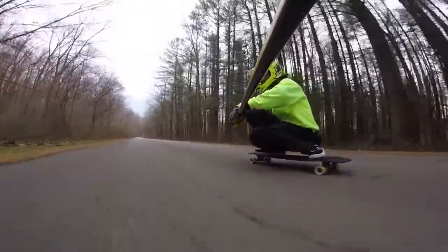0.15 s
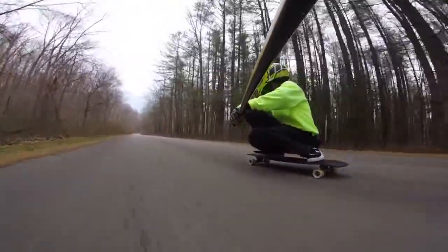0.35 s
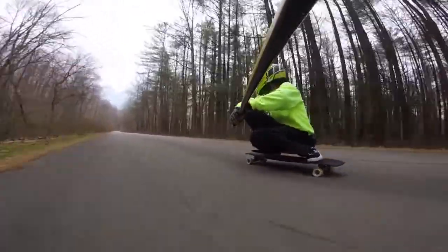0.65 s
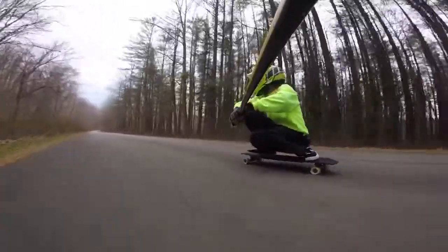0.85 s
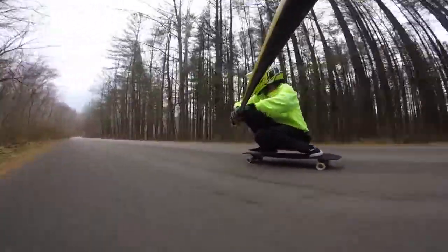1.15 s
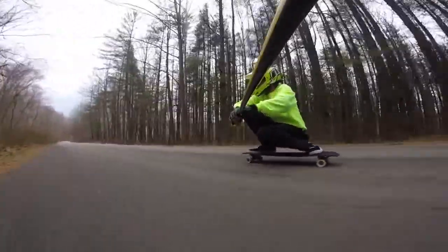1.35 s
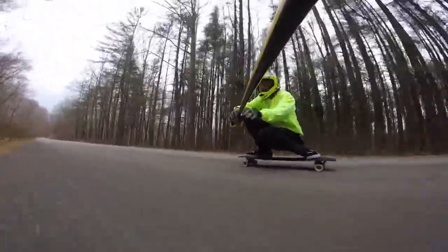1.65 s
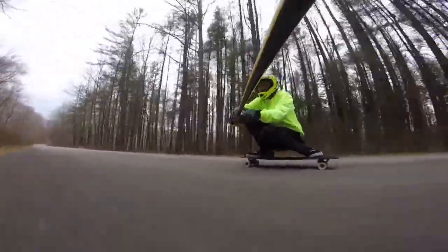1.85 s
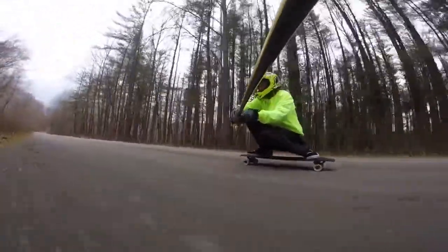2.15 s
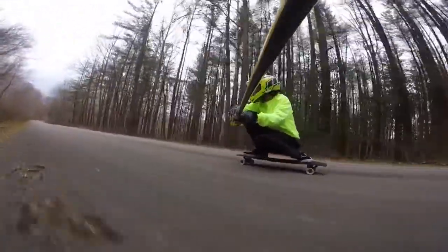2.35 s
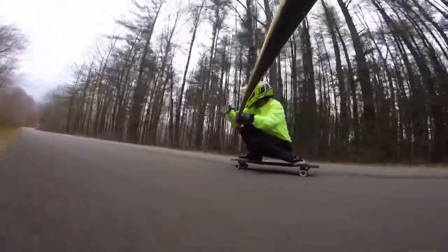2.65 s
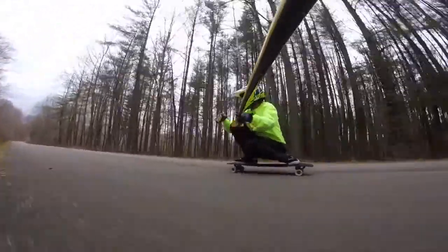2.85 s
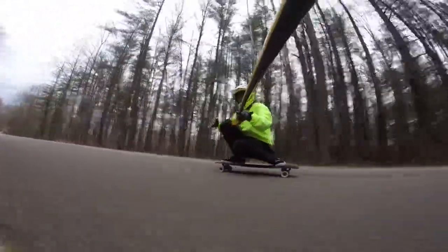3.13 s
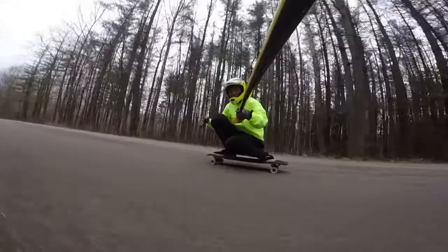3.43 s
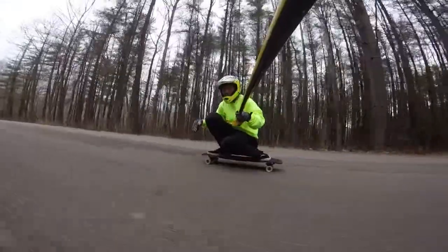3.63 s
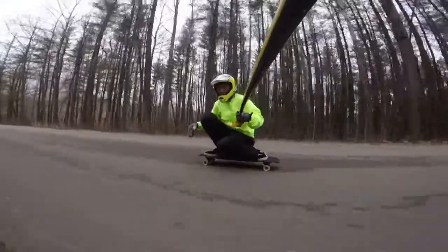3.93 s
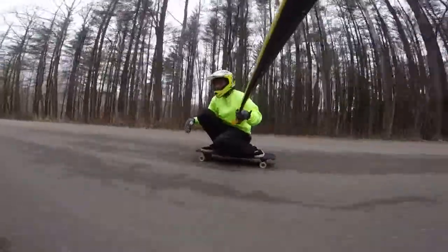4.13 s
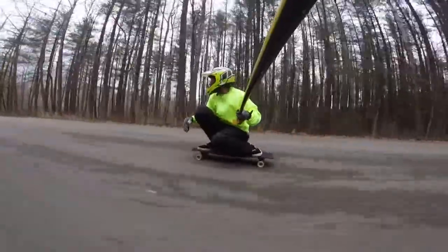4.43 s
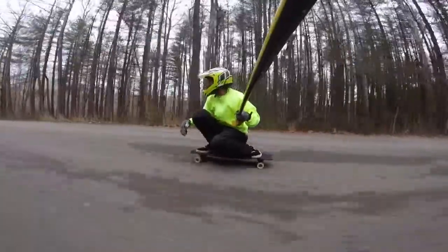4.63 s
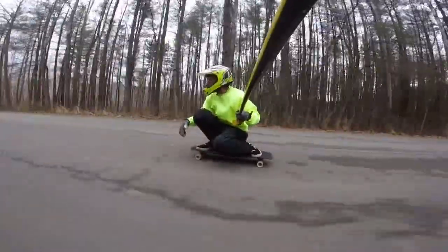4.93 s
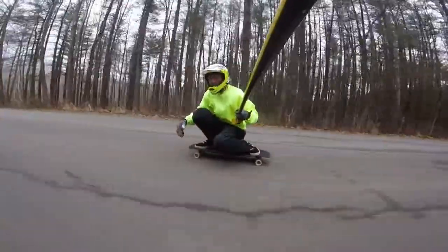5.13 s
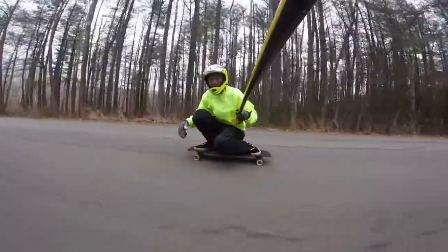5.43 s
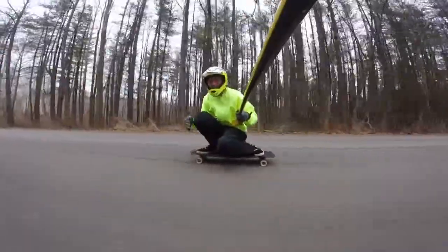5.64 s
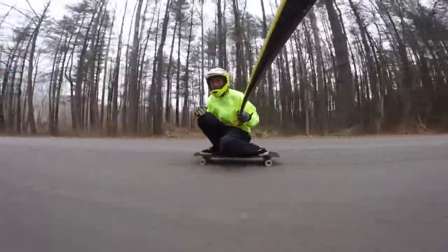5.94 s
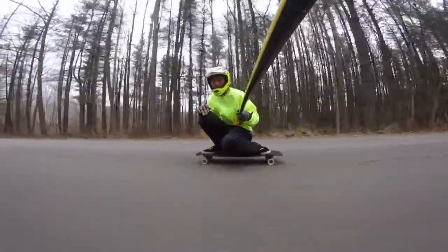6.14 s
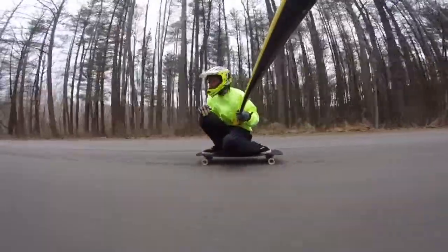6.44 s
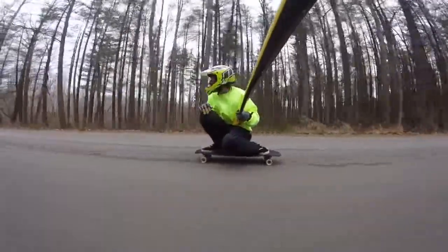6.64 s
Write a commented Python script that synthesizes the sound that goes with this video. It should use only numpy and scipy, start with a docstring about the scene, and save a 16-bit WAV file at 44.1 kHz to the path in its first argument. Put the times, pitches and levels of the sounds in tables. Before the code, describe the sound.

Wind buffets a cased microphone over the steady roar of longboard wheels on asphalt, with two loud hard knocks and later crackling gusts.

```python
"""On a downhill asphalt road, a longboarder carries a microphone in a hard case on a pole.
Wind is filtered noise: slow buffets, turbulence that flares with suction, eddies shed by the pole.
Wheels are noise bands that drone, roar, whirr and hiss; grit clicks and short chirps squeak.
Twice the mount knocks loudly, as cracks, sagging thuds and decaying modes, with a weak rebound at the end.
Gain control ducks at each loud knock and takes about a second to recover."""
import sys
import numpy as np
from scipy import signal
from scipy.fft import rfft, irfft, next_fast_len
from scipy.io import wavfile
from scipy.ndimage import uniform_filter1d, minimum_filter1d

SR = 44100
rng = np.random.default_rng(int(sys.argv[2]) if len(sys.argv) > 2 else 0)


def pcm_store(signal):
    """Save signal as 16-bit PCM."""
    levels = np.round(np.clip(np.atleast_2d(signal), -1, 1) * 32767)
    wavfile.write(sys.argv[1], SR, levels.astype(np.int16).T)


N = 298998
TIME = np.arange(N) / SR


def from_db(db):
    """Logarithmic level: decibels to an amplitude gain."""
    return 10 ** (np.asarray(db) / 20)


def rms_one(x):
    """Normalisation: scale to rms 1."""
    return x / np.sqrt(np.mean(x ** 2) + 1e-20)


def curve(rows):
    """Linear interpolation: a (t/s, value) table at every sample."""
    return np.interp(TIME, *np.transpose(rows))


def ramp(start_s, length_s):
    """Linear transition: from 0 to 1 in the given time."""
    return np.clip((TIME - start_s) / length_s, 0, 1)


def bump(s, half_s):
    """Raised-cosine window: a smooth rise to 1 at s and back."""
    return np.cos(np.pi / 2 * np.minimum(np.abs(TIME - s) / half_s, 1)) ** 2


def decay(t, t60):
    """Exponential damping: falls by 60 dB in t60."""
    return np.exp(-np.log(1000) * t / t60)


def swell(t, peak_s, steepness):
    """Transient force: builds to 1 at peak_s and dies away."""
    return (t / peak_s * np.exp(1 - t / peak_s)) ** steepness


def coloured(x, gain_at):
    """Linear filtering by a function of frequency; white noise or a click keeps its energy."""
    size = next_fast_len(N + SR // 10)
    hz = np.maximum(np.arange(size // 2 + 1) * SR / size, 1)
    return irfft(rfft(x, size) * rms_one(gain_at(hz)), size)[:N]


def contour(spectrum, rolloff_db_per_octave=18):
    """Spectral envelope: gain for a (f/Hz, level/dB) table that keeps falling above its last point."""
    points, db = np.transpose(spectrum)

    def gain_at(hz):
        octaves_above = np.maximum(np.log2(hz / points[-1]), 0)
        level = np.interp(np.log(hz), np.log(points), db)
        return from_db(level - rolloff_db_per_octave * octaves_above)
    return gain_at


def shaped(gain_at):
    """Filtered white noise: rms 1, with the given function of frequency as its spectrum."""
    return rms_one(coloured(rng.standard_normal(N + SR // 10), gain_at))


def noise(spectrum):
    """Filtered white noise: rms 1, with a (f/Hz, level/dB) spectrum."""
    return shaped(contour(spectrum))


def resonant_noise(centre_hz, width_hz):
    """Resonance: noise passed twice through one resonator."""
    return shaped(lambda hz: 1 / (1 + ((hz ** 2 - centre_hz ** 2) / (hz * width_hz)) ** 2))


def flutter(rate, depth_db):
    """Random modulation: a gain of rms depth_db that wanders about rate times a second."""
    return from_db(depth_db * shaped(lambda hz: 1 / (1 + (hz / rate) ** 2)))


def grains(per_s, spectrum):
    """Shot noise: dense random clicks of uneven size; rms 1."""
    clicks = (rng.random(N) < per_s / SR) * rng.uniform(-1.1, 1, N)
    return rms_one(coloured(clicks, contour(spectrum)))


def ticks(rows, spectrum):
    """Damped impacts: a tiny noise burst at each (t/s, level/dB, t60/s), its onset slightly rounded."""
    envelope, t = np.zeros(N + SR), TIME[:SR // 10]
    for s, db, t60 in rows:
        start = round(s * SR)
        envelope[start:start + len(t)] += from_db(db) * decay(t, t60)
    return uniform_filter1d(envelope[:N], size=24) * noise(spectrum)


# the carve turns the case across the wind
CROSSWIND_S, CROSSWIND_TAKES_S = 3.65, 0.58
# strength of the air stream on the case, as turbulence: t/s, level/dB
AIR_STREAM = [(0, -21.5), (1.05, -23.5), (1.6, -21), (1.8, -27), (2.0, -25), (2.35, -28.5), (2.8, -27),
              (3.05, -21.5), (3.3, -26), (3.7, -22), (4.35, -24.5), (4.75, -22.5), (5.2, -26),
              (5.75, -20.5), (6.25, -21), (6.65, -21)]


def air_levels(mean_db=-24, buffet_db=-17.5, buffet_follows=0.17, buffet_cross_db=-3.0,
               crackle_db=-66, crackle_follows=0.34, crackle_cross_db=9):
    """Flow incidence: all gains follow the air stream; crosswind trades buffet for crackle."""
    stream = curve(AIR_STREAM) - mean_db
    across = ramp(CROSSWIND_S, CROSSWIND_TAKES_S)
    buffet = buffet_db + buffet_follows * stream + buffet_cross_db * across
    turbulence = mean_db + stream
    crackle = crackle_db + crackle_follows * stream + crackle_cross_db * across
    return from_db([buffet, turbulence, crackle])


# single gusts: t/s, half length/s, level/dB
GUSTS = [(0.784, 0.26, -19), (1.704, 0.18, -19.5), (2.097, .3, -13), (3.662, 0.45, -16.5),
         (5.015, 0.13, -13)]


def gusts():
    """Low-frequency pressure pulses: big, slow lumps of air thump the case."""
    level = sum(from_db(db) * bump(s, half_s) for s, half_s, db in GUSTS)
    return level * resonant_noise(centre_hz=36, width_hz=54)


# the eddies lock in step and throb: start t/s, length/s, level/dB
THROBS = [(4.017, 0.18, -21), (5.066, 0.44, -16.5)]
THROB_HZ, THROB_FADE_S = 83, 0.022


def throb():
    """Coherent vortex shedding: eddies in step beat the air at an almost steady pitch."""
    hz = THROB_HZ * flutter(rate=8, depth_db=.5)
    level = np.zeros(N)
    for s, length, db in THROBS:
        to_nearest_end = np.minimum(TIME - s, s + length - TIME)
        level += from_db(db) * np.clip(to_nearest_end / THROB_FADE_S, 0, 1)
    return level * flutter(rate=15, depth_db=1.0) * np.sin(2 * np.pi * np.cumsum(hz) / SR)


# eddies shed by the pole: t/s, level/dB
SHEDDING = [(0, -41), (3.6, -37), (4.05, -18), (4.4, -22.5), (4.7, -14.5), (5.0, -20), (5.2, -23.5),
            (5.55, -19.5), (5.8, -25.5), (6.78, -18)]


def shed_eddies():
    """Vortex shedding: eddies off the pole make noise around one resonance."""
    return from_db(curve(SHEDDING)) * resonant_noise(centre_hz=78.8, width_hz=40.6)


# spectra of slow buffets, turbulence and fine crackle of the air on the port: f/Hz, level/dB per Hz
BUFFET = [(8, -1.5), (18, -7.5), (30, 5), (55, -0.5), (100, -2.5), (135, -8.5), (220, -35.5), (500, -93.5)]
TURBULENCE = [(60, -23.5), (125, 0.5), (220, -3), (310, -8), (420, -13), (650, -22.5), (850, -23.5),
              (1300, -53.5), (2200, -54), (4200, -73.5), (7000, -72), (12000, -94.5)]
CRACKLE = [(700, -12.5), (1400, 5), (2000, 6), (2500, 1.5), (3000, -7.5), (3700, -4.5), (4300, -15.5),
           (6700, -13.5), (8200, -23.5), (10500, -25.5), (12500, -45)]
CRACKLES_PER_S, CRACKLE_GROWTH_DB = 3000, 4.2


def wind(suction_db=2.5):
    """Turbulent pressure: suction makes turbulence flare; the largest lumps crackle on the port."""
    buffet, turbulence, crackle = air_levels()
    lumps = buffet * noise(BUFFET) + shed_eddies() + throb() + gusts()
    # pressure relative to its rms in the surrounding half second or so
    local_rms = np.sqrt(uniform_filter1d(lumps ** 2, size=20000))
    pressure = np.clip(lumps / local_rms, -2.6, 2.6)
    flare = from_db(-suction_db * pressure)
    breaking = rms_one(from_db(CRACKLE_GROWTH_DB * np.abs(pressure)))
    rushing = turbulence * flare * noise(TURBULENCE)
    return lumps + rushing + crackle * breaking * grains(CRACKLES_PER_S, CRACKLE)


# the hardest eddies spit on the port: t/s, level/dB of the main click
SPITS = [(3.8061, -34), (4.017, -34), (4.0373, -30), (4.101, -30), (4.4783, -30), (4.5905, -29),
         (4.6443, -30), (4.8065, -30), (4.8463, -30), (4.9065, -30), (4.9516, -33), (5.0614, -28),
         (5.1561, -35), (5.1813, -32), (5.2111, -25.5), (5.2925, -31), (5.3591, -31), (5.3644, -27.5),
         (5.3838, -32), (5.4072, -33), (5.4873, -30.5), (5.5081, -31), (5.5754, -33), (5.5889, -25.5),
         (5.7324, -31), (5.7728, -28), (5.8367, -27), (5.9322, -32), (6.1038, -32.5), (6.1375, -33),
         (6.1796, -31), (6.1941, -32.5), (6.2459, -26.5), (6.251, -35), (6.3732, -34), (6.4173, -33),
         (6.4411, -32), (6.5256, -33.5), (6.6012, -33.5), (6.6177, -32.5), (6.6838, -33), (6.698, -29),
         (6.732, -28), (6.738, -33)]
# spectrum of a spit: f/Hz, level/dB
SPIT_SPECTRUM = [(700, -5), (1400, 2), (2600, 2), (3700, -1.5), (4300, -6), (6700, -8), (8200, -17),
                 (10500, -21), (12000, -33), (16000, -48)]
# the weaker clicks: greatest distance from the main one, and level relative to it
SPIT_CRUMBLE_S, SPIT_CRUMBLE_DB = .003, -9


def spits(count=3):
    """Impulsive flow noise: each hard eddy breaks with one click among a few weaker ones."""
    clicks = np.zeros(N)
    for s, db in SPITS:
        offsets, sizes = rng.uniform(-1, 1, (2, count))
        places = np.round((s + SPIT_CRUMBLE_S * offsets) * SR).astype(int)
        clicks[places] += from_db(db + SPIT_CRUMBLE_DB) * np.sign(sizes)
        clicks[round(s * SR)] += from_db(db)
    return coloured(clicks, contour(SPIT_SPECTRUM))


# how hard the wheels press and scrub on the asphalt: t/s, level/dB re cruising
ROAD_LOAD = [(0, 4.5), (.35, 4.5), (.95, -2), (1.33, 2), (1.58, 0), (1.69, -8.5), (1.85, -7), (2.05, 0.5),
             (2.75, -4.5), (3.1, 0.5), (4.0, 2.5), (4.25, 1), (4.75, 3), (5.4, -4.5), (6.05, 0),
             (6.78, -3.5)]
# the microphone swings away from the wheels: their treble dims and the drone gains a little
SHADOW_S, SHADOW_TAKES_S = 4.85, 1.3


def wheel_level(db, follows, carve_db, shadow_db):
    """Load and directivity: a share of the road load, a drop in the carve, a shift as the mic turns."""
    carve = carve_db * ramp(CROSSWIND_S, CROSSWIND_TAKES_S)
    shadow = shadow_db * ramp(SHADOW_S, SHADOW_TAKES_S)
    return from_db(db + follows * curve(ROAD_LOAD) + carve + shadow)


# each knock jolts the deck, which drones louder for a while; the fade is to 1/e in dB
JOLT_DB, JOLT_FADE_S = 4.5, 0.62


def jolts():
    """Shock excitation: the drone flares with the strength of each knock and settles again."""
    hardest_db = max(db for _, db, *_ in KNOCKS)
    lift_db = np.zeros(N)
    for s, db, *_ in KNOCKS:
        settling = (TIME > s) * np.exp(-np.abs(TIME - s) / JOLT_FADE_S)
        lift_db += JOLT_DB * from_db(db - hardest_db) * settling
    return from_db(lift_db)


# spectra of the hollow, steep-sided deck resonance, the roar under the wheels, the bearings,
# the tread's hiss, and its sizzle on the straight: f/Hz, level/dB per Hz
DRONE = [(300, -40), (420, -19), (475, -4), (545, 0), (625, -2.5), (665, -17), (760, -32)]
ROAR = [(330, -28.5), (410, -1.5), (470, 6), (600, 0.5), (700, -1), (780, 0.5), (1000, -7), (1200, -16),
        (1500, -26.5), (1800, -43), (3000, -68.5)]
WHIRR = [(1200, -10.5), (1800, -6), (2200, 1), (2550, -1), (2950, -13), (3250, -6), (3650, 0.5),
         (3900, -5.5), (4200, -12), (6000, -31.5)]
HISS = [(2500, -11.5), (4200, -12), (4800, 1), (5500, 1), (6700, 1.5), (7600, -5.5), (8050, -14),
        (8450, -10), (9000, -18.5), (9700, -14.5), (11800, -16.5), (13000, -46)]
SIZZLE = [(7000, -33), (8450, 0), (9000, -13), (9700, -3), (11000, -1), (12000, -3), (13000, -30)]
ROAR_DB, SIZZLE_DB = -32.5, -76  # when cruising
TURN_S, TURN_TAKES_S = 1.54, .2  # the sizzle fades out as the turn begins


def wheels():
    """Rolling noise: road grain shakes the deck and roars; bearings whirr and the tread hisses."""
    deck = jolts() * wheel_level(db=-31.0, follows=0.38, carve_db=-8.5, shadow_db=2.5) * noise(DRONE)
    contact = from_db(ROAR_DB + curve(ROAD_LOAD)) * noise(ROAR)
    bearings = wheel_level(db=-55.5, follows=0.43, carve_db=-1.5, shadow_db=-13.5) * noise(WHIRR)
    tread = wheel_level(db=-61.5, follows=.7, carve_db=-5.0, shadow_db=-8.0) * noise(HISS)
    straight = 1 - ramp(TURN_S, TURN_TAKES_S)
    sizzle = from_db(SIZZLE_DB + .5 * curve(ROAD_LOAD)) * straight * noise(SIZZLE)
    low = flutter(rate=99, depth_db=2.18) * (deck + contact)
    return low + flutter(rate=130, depth_db=1.5) * (bearings + tread + sizzle)


# grit under the wheels: t/s, f/Hz, level/dB
GRIT = [(3.7984, 3500, -45), (3.863, 2400, -45), (4.0365, 2400, -45), (4.1496, 2200, -37),
        (4.208, 2900, -45), (4.2585, 3300, -45)]


def grit():
    """Impact excitation: each stone clicks under a wheel as noise peaking at its listed frequency."""
    out = np.zeros(N)
    for s, hz, db in GRIT:
        spectrum = [(hz / 4, -14), (hz, 0), (1.5 * hz, -14), (3 * hz, -27)]
        out += ticks([(s, db, .025)], spectrum)  # t60 in s
    return out


# faint squeaks as the board carves: t/s, f/Hz, half length/s, level/dB
SQUEAKS = [(2.322, 1200, .02, -50), (2.325, 1545, 0.026, -47), (2.371, 1735, 0.022, -53),
           (2.409, 1750, .014, -56), (2.424, 1540, .012, -52), (2.426, 1205, .02, -45),
           (2.454, 1755, 0.026, -49)]


def squeaks():
    """Stick-slip friction: short chirps, unsteady in pitch and strength."""
    waver, rough = flutter(rate=160, depth_db=.3), flutter(rate=120, depth_db=3.5)
    warped_time = np.cumsum(waver) / SR
    chirps = np.zeros(N)
    for s, hz, half_s, db in SQUEAKS:
        chirps += from_db(db) * bump(s, half_s) * np.sin(2 * np.pi * hz * warped_time)
    return rough * chirps


# spectrum of the crack of a knock, also of the rattle: f/Hz, level/dB per Hz
CRACK = [(400, -13), (700, -14), (1100, 11.5), (2000, -5), (2600, -6), (3100, -25), (3700, -11),
         (4200, -19), (4800, -8), (6200, -9.5), (8000, -31), (9500, -28), (11500, -21), (16000, -37)]
# the mount rattles: t/s, level/dB, t60/s
RATTLE = [(2.315, -43, .03), (2.421, -45, 0.036), (3.1457, -30, 0.023), (3.149, -30, .02),
          (3.1568, 8.5, 0.0054), (3.1705, -18, 0.0055), (3.1745, -21, 0.007), (3.1897, -20, 0.0061)]


def rattle():
    """Loose-joint impacts: the mount ticks with the spectrum of the crack."""
    return ticks(RATTLE, CRACK)


# modes of the case: f/Hz, level/dB, t60/s
CASE_MODES = [(680, -5, 0.04), (806, 1.5, 0.03), (1750, -3, 0.018), (1990, 6.5, 0.018), (2380, -3, 0.016),
              (2700, -3, 0.015), (3720, 0, 0.014), (4880, -6, 0.012), (5650, -10, 0.013), (6070, -7, .011)]


def case_ring(t):
    """Modal superposition: damped sines of alternating sign."""
    ring = np.zeros(len(t))
    for k, (hz, db, t60) in enumerate(CASE_MODES):
        ring += (-1) ** k * from_db(db) * decay(t, t60) * np.sin(2 * np.pi * hz * t)
    return ring


# knocks of the mount, the last one a rebound: t/s, level/dB, thud f/Hz as its swell peaks,
# sag/octaves over the swell, swell/s, then crack, case ring and pole ping level/dB re thud
KNOCKS = [(1.8595, 10.5, 1030, .05, .0035, -1, -7.5, -55), (3.1526, 12, 1500, .33, .0027, -15, -11, -50),
          (3.1712, -13.5, 1550, .1, .0026, -19, -9, -50)]
# spectrum of what lingers of a knock: f/Hz, level/dB per Hz
KNOCK_TAIL = [(300, -8), (700, 3), (1100, 3), (1600, 0), (2400, -4), (3000, -11), (3700, -5), (4300, -19),
              (7000, -24)]
PING_HZ, PING_T60 = 1912, .38  # the pole pings on; t60 in s


def knocks(crack_peak_s=0.0018, tail_t60=0.087, tail_db=-20.5):
    """Impact and modal decay: a slipping joint cracks, thuds, rings the case and pings the pole."""
    out, crack, dull = np.zeros(N), noise(CRACK), noise(KNOCK_TAIL)
    t, waver = TIME[:SR // 2], flutter(rate=40, depth_db=1.5)
    contact = np.minimum(t / crack_peak_s, 1)
    ring = case_ring(t)
    for s, db, thud_hz, sag, swell_s, crack_db, ring_db, ping_db in KNOCKS:
        start = round(s * SR)
        span = slice(start, start + len(t))
        # the contact is stiffest at first, so the pitch sags
        thud_pitch = thud_hz * 2 ** (sag * np.maximum(1 - t / swell_s, -1))
        thud = swell(t, swell_s, steepness=9) * np.sin(2 * np.pi * np.cumsum(thud_pitch) / SR)
        snap = from_db(crack_db) * swell(t, crack_peak_s, steepness=2.4) * crack[span]
        tail = from_db(tail_db) * decay(t, tail_t60) * dull[span]
        ping = from_db(ping_db) * decay(t, PING_T60) * np.sin(2 * np.pi * PING_HZ * t) * waver[span]
        body = contact * (from_db(ring_db) * ring + tail)
        out[span] += from_db(db) * (thud + body + snap + ping)
    return out


def scene():
    """Superposition: everything reaches the one microphone from close by."""
    air = wind() + spits()
    mount = knocks() + rattle()
    return (air + wheels() + grit() + squeaks() + mount)[None]


def held(db, db_per_s):
    """Peak holding: follows peaks at once and lets go at a steady rate."""
    return np.maximum.accumulate(db + db_per_s * TIME) - db_per_s * TIME


CEILING = .7  # amplitude above which the gain is cut
# the slow stage takes off at most its range
SLOW_RANGE_DB, RECOVERY_DB_PER_S, FAST_RECOVERY_DB_PER_S = 11, 12, 45


def gain_control(x):
    """Look-ahead limiting: gain drops just before a peak; deep cuts recover fast, the rest creeps back."""
    over = np.maximum(20 * np.log10(np.abs(x) / CEILING + 1e-9), 0)
    slow = held(np.minimum(over, SLOW_RANGE_DB), RECOVERY_DB_PER_S)
    fast = held(over, FAST_RECOVERY_DB_PER_S)
    gain_db = minimum_filter1d(-np.maximum(slow, fast), size=32)
    return x * from_db(uniform_filter1d(gain_db, size=32))


MIC_TOP, CUTOFF_HZ = 3.6, 17000  # amplitude where the microphone saturates; edge of the top cut


def record(dry):
    """Saturation and band-limiting: the microphone rounds peaks; gain control and top cut follow."""
    soft_start = ramp(0, .004)
    picked_up = MIC_TOP * np.tanh(dry[0] / MIC_TOP) * soft_start
    top_cut = signal.cheby2(12, 70, CUTOFF_HZ, fs=SR, output="sos")
    return signal.sosfilt(top_cut, gain_control(picked_up))[None]


dry = scene()
out = record(dry)
pcm_store(out)
```